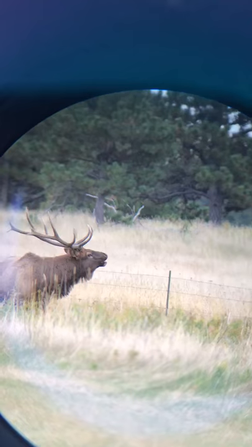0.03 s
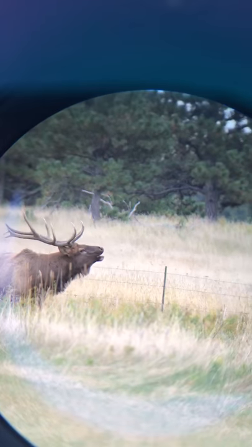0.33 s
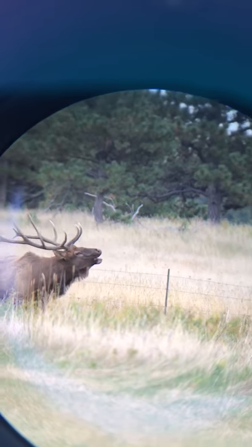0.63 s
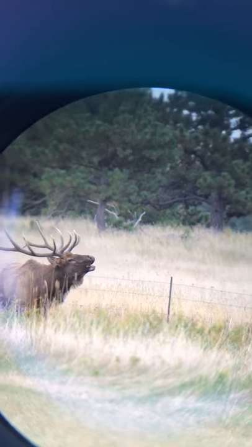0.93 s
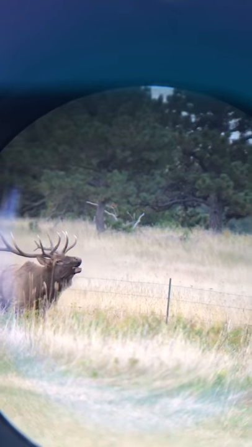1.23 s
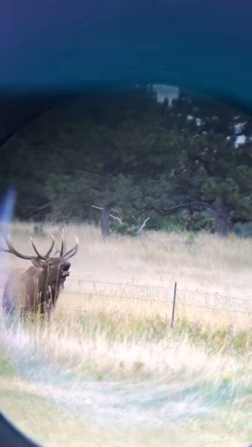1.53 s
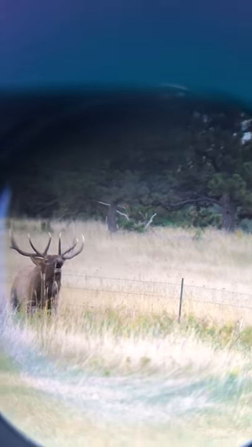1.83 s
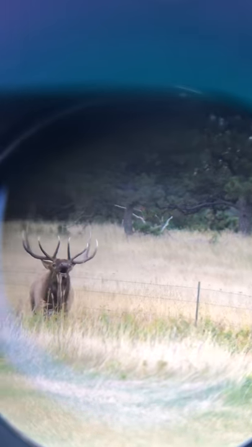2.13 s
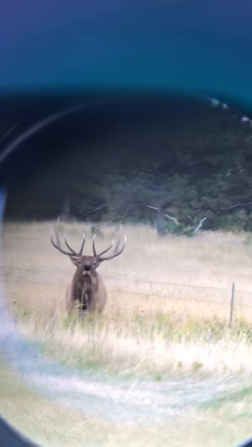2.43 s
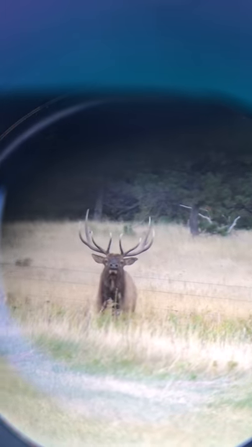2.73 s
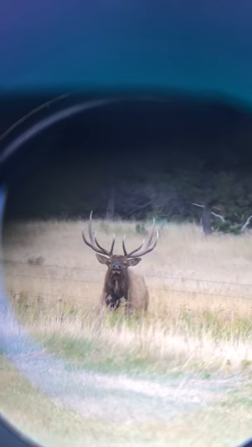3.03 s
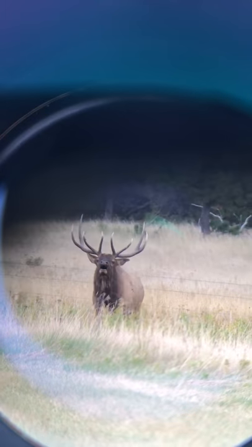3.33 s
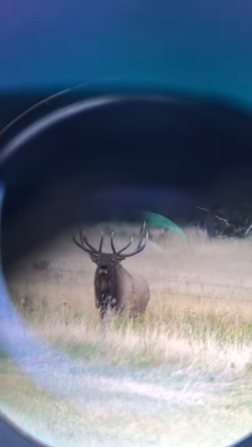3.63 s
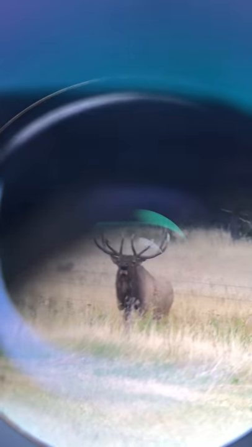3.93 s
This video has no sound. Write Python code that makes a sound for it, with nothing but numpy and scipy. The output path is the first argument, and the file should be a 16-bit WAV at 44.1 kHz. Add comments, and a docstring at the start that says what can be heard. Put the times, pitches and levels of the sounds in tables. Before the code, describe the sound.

A bull elk bugles across an open meadow, with wind rumbling on the microphone and a faint electrical sizzle and hiss throughout. At about 1 second its whistle climbs in steps, holding high from 1.5 to 2 seconds. It then slides down into a harsh, breathy roar with hoarse squeals, fading just after 3 seconds with a faint echo. At 3.8 seconds a second call sweeps upward.

```python
"""An open meadow, with wind buffeting the microphone and a thin electrical sizzle over the camera's hiss.
A second in, a bull elk bugles across the grass: his whistle climbs in steps and holds. Just after
two seconds it slides down into a harsh roar, fold pulses and breath ringing his throat, and the trees
answer faintly. Near four seconds a second call sweeps up."""
import sys
import numpy as np
from scipy import signal
from scipy.fft import rfft, irfft, next_fast_len
from scipy.io import wavfile
from scipy.ndimage import uniform_filter1d, map_coordinates

SR = 44100
rng = np.random.default_rng(int(sys.argv[2]) if len(sys.argv) > 2 else 0)


def transcribe(signal):
    """Save signal, clipped to [-1, 1], as a 16-bit WAV file at the path in sys.argv[1]."""
    frames = np.atleast_2d(signal).T
    limited = np.clip(frames, -1, 1)
    pcm = np.round(limited * 32767).astype(np.int16)
    wavfile.write(sys.argv[1], SR, pcm)


N = 176400


def amp(db):
    """Decibels to gain."""
    return 10 ** (np.asarray(db) / 20)


def unit(x):
    """Scale to rms 1."""
    return x / np.sqrt(np.mean(x ** 2) + 1e-20)


def clock():
    """Time of every sample in seconds."""
    return np.arange(N) / SR


def curves(rows):
    """One value per sample for each column after the time."""
    times, *columns = np.transpose(rows)
    return [np.interp(clock(), times, column) for column in columns]


def during(rows):
    """1 while a table lasts, with short fades outside it."""
    return np.clip(1 + np.minimum(clock() - rows[0][0], rows[-1][0] - clock()) / 0.026, 0, 1)


def wobble(rate):
    """A smooth random curve, rate knots a second."""
    return map_coordinates(rng.standard_normal(8192), [clock() * rate + 2], mode="wrap")


def rasp(rate):
    """A complex wobble that shakes a tone's level and phase."""
    return (wobble(rate) + 1j * wobble(rate)) / np.sqrt(2)


def filtered(x, response):
    """x through a gain given as a function of frequency."""
    size = next_fast_len(N + SR // 2)
    return irfft(rfft(x, size) * response(np.fft.rfftfreq(size, 1 / SR)), size)[:N]


def coloured(x, spectrum):
    """x through a (Hz, dB) spectrum, at rms 1."""
    freqs, db = np.transpose(spectrum)
    return unit(filtered(x, lambda hz: amp(np.interp(np.log(hz + 1), np.log(freqs), db))))


# The bull across the meadow: his long bugle, then the rising second call.
# Each row: time in seconds, pitch in Hz, level in dB, roughness from 0 to 1.
LONG_CALL = [(1.02, 1303, -91, .1), (1.06, 1376, -71.5, 0), (1.1, 1387, -66.5, 0), (1.14, 1454, -73, 0.23),
             (1.23, 1452, -70.5, 0.3), (1.29, 1443, -62, 0), (1.315, 1499, -71, 0.9),
             (1.345, 1600, -67.5, 0), (1.41, 1622, -57.5, 0), (1.465, 1632, -63.5, 0.07),
             (1.48, 1790, -69, 0.3), (1.505, 1852, -65, 0), (1.58, 1853, -56.5, .002),
             (1.67, 1863, -62, 0.04), (1.8, 1855, -56.5, .002), (1.87, 1854, -63.5, .002),
             (1.92, 1848, -69.5, 0.03), (1.965, 1844, -61, 0.04), (1.998, 1832, -58.5, 0),
             (2.015, 1756, -76, .6), (2.06, 1644, -53, 0.1), (2.09, 1530, -57, 0.3), (2.125, 1385, -47, 0),
             (2.16, 1357, -60, 0.08), (2.19, 1245, -93, .7), (2.25, 1110, -66, 1)]
RISING_CALL = [(3.78, 613.5, -81, 0.16), (3.802, 648, -65.5, 0.13), (3.812, 794, -74, 0.7),
               (3.82, 954, -58.5, 0.11), (3.832, 980, -66, 0.11), (3.839, 1378, -58.5, 0.6),
               (3.847, 1554, -57.5, 0.59), (3.855, 1700, -53.5, 0.11), (3.872, 1730, -61.5, 0.32),
               (3.885, 1863, -60.5, 0.06), (3.935, 1852, -55, .04), (4.0, 1823, -56, 0.078)]
# The octave above each call. Each row: time in seconds, level in dB.
LONG_OCTAVE = [(1.02, -115), (1.45, -105), (1.5, -87), (1.58, -74), (1.65, -66), (1.82, -61), (1.919, -59),
               (1.97, -64), (2.01, -62), (2.06, -71), (2.12, -69), (2.16, -64), (2.21, -64), (2.25, -74)]
RISING_OCTAVE = [(3.78, -86), (3.83, -75), (3.85, -87), (3.868, -80), (3.883, -59.5), (3.93, -55),
                 (3.965, -63.5), (4.0, -63)]


def whistle(call, octave, fold_cycles):
    """A wavering tone and two overtones; roughness smears them and adds the flutter of the folds."""
    hz, db, roughness = curves(call)
    octave_db, = curves(octave)
    third_db = octave_db - 31.5
    phase = 2 * np.pi * np.cumsum(hz * (1 + 0.0015 * wobble(60))) / SR
    flutter = 0.21 * np.cos(2 * np.pi * fold_cycles)
    out = np.zeros(N)
    for harmonic, level in enumerate([db, octave_db, third_db], 1):
        grain = np.sqrt(1 - roughness) + np.sqrt(roughness) * (rasp(265.2) + flutter)
        out += amp(level) * np.real(grain * np.exp(1j * harmonic * phase))
    return np.sqrt(2) * out * during(call)


# His breath as it reaches the microphone, faint under the whistle and loud in the roar.
# Each row: time in seconds, then the levels in dB of the low, middle and top resonances.
ROAR_LEVELS = [(1.0, -84, -98, -100), (1.2, -93, -85, -90), (1.32, -85, -84, -89), (1.48, -80, -76.5, -82),
               (1.6, -88, -82, -92), (1.8, -89, -89, -93), (1.97, -82, -88, -93), (2.02, -80.5, -64.5, -68),
               (2.12, -72, -62, -71), (2.2, -69.5, -65.5, -69.5), (2.279, -71, -65, -68.5),
               (2.39, -68.5, -65.5, -69), (2.501, -67.5, -63.5, -70), (2.65, -65.5, -62.5, -68.5),
               (2.74, -66.5, -62.5, -65), (2.83, -68.5, -62, -67), (2.9, -62.5, -65.5, -70.5),
               (2.97, -65.5, -62.5, -72.5), (3.045, -66.5, -72, -76.5), (3.1, -72, -84, -93),
               (3.4, -75, -94, -104), (3.6, -82.5, -100, -102), (3.72, -79, -101, -84),
               (3.8, -93, -75, -88), (3.83, -67, -68, -72.5), (3.9, -80, -63.5, -74),
               (4.0, -77, -70.5, -78)]
# Resonances of his throat and mouth. Each row: centre in Hz, width in Hz, relative level in dB.
LOW_MODES = [(560, 41, 1), (674, 82, 0.5), (964.5, 100, 6), (1072, 31, 6)]
MID_MODES = [(1410, 30, -2), (1470, 250, -9.5), (1626, 43, -3), (1970, 58, -3), (2091, 108, 2.5),
             (2320, 87, 0.5), (2564, 110, -5), (2790, 220, -9)]
TOP_MODES = [(3163, 70, -4), (3264, 82, 0), (3540, 180, -5), (3800, 130, -18.5), (3983, 170, -1.5),
             (4490, 290, -17.5), (5390, 440, -22.5)]


def roar(fold_cycles, chop_depth=0.23, pulse_gain=0.57):
    """Ragged fold pulses and the air they chop ring the throat."""
    closures = np.diff(np.floor(fold_cycles), prepend=0)
    pulses = unit(closures * amp(rng.standard_normal(N)))
    breath = unit(rng.standard_normal(N) * np.exp(chop_depth * np.cos(2 * np.pi * fold_cycles)))
    source = breath + pulse_gain * pulses
    bands = zip(curves(ROAR_LEVELS), [LOW_MODES, MID_MODES, TOP_MODES])
    return during(ROAR_LEVELS) * sum(amp(db) * throat(source, modes) for db, modes in bands)


def throat(source, modes, swell_db=1.5, swell_hz=12):
    """Steep-sided resonances, each swelling on its own; their sum is at rms 1."""
    out = np.zeros(N)
    for hz, width, db in modes:
        band = filtered(source, lambda f: np.abs(f * width / (hz * hz - f * f + 1j * f * width)) ** 2)
        out += band * amp(db + swell_db * wobble(swell_hz))
    return unit(out)


def vocal_folds(growl_hz=118.15, jitter=0.064):
    """Running cycle count of the unsteady folds under the whistle and the roar."""
    return np.cumsum(growl_hz * (1 + jitter * wobble(70))) / SR


# Hoarse squeals where his voice breaks or turns harsh. Each row: middle in seconds,
# length in seconds, pitch in Hz, glide in Hz per second, level in dB.
VOICE_BREAKS = [(1.329, 0.074, 1404, -800, -69), (1.315, 0.058, 1875, 900, -80),
                (2.021, 0.066, 2410, -5000, -69), (2.077, 0.041, 2076, -3000, -60),
                (2.12, 0.094, 3340, 0, -65), (2.288, .04, 2070, 0, -67), (2.385, .07, 974, -300, -62.5),
                (2.66, 0.087, 2690, 1200, -64.5), (2.8, 0.63, 3190, -600, -70), (2.833, 0.27, 1082, 8, -69),
                (2.947, .06, 1670, 0, -65.5), (3.011, 0.067, 1399, 0, -64), (2.125, 0.057, 650, 0, -69),
                (3.828, .04, 2930, 9000, -68.5), (3.958, 0.26, 2350, 904, -66), (3.982, .05, 2930, 0, -68)]


def squeals():
    """The voice breaks into short gliding tones, each swelling and dying under a rasp."""
    out = np.zeros(N)
    grain = 1 + rasp(125.8)
    for middle, length, hz, glide, db in VOICE_BREAKS:
        span = np.abs(clock() - middle) < length / 2
        t = clock()[span] - middle
        tone = np.exp(2j * np.pi * (hz + glide * t / 2) * t)
        out[span] += amp(db) * np.cos(np.pi * t / length) * np.real(grain[span] * tone)
    return out


# Tone of the echo from the meadow's edge. Each row: frequency in Hz, relative level in dB.
ECHO_SPECTRUM = [(300, -3.5), (1400, 3.5), (2000, -12.5), (4000, -9)]


def tree_echo(elk, level_db=-20.5, t60_s=0.86, delay_s=0.052):
    """The edge of the wood throws the call back, faint and dull."""
    t = clock()
    decay = amp(-60 * t / t60_s) * (t > delay_s)
    tail = coloured(rng.standard_normal(N), ECHO_SPECTRUM) * decay
    return amp(level_db) * signal.fftconvolve(elk, tail / np.linalg.norm(tail))[:N]


# Gusts right on the microphone. Each row: time in seconds, level in dB.
GUSTS = [(0.06, -53.5), (0.2, -38.5), (0.29, -51), (0.32, -39.5), (0.48, -60), (0.52, -45), (0.6, -87),
         (0.64, -42.5), (0.68, -57), (0.74, -36.5), (0.87, -64.5), (0.99, -36.5), (1.01, -53),
         (1.16, -48.5), (1.19, -58.5), (1.34, -49.5), (1.53, -69), (1.57, -59.5), (1.86, -78), (1.9, -59),
         (2.17, -55), (2.23, -45), (2.26, -52), (2.33, -44.5), (2.45, -55.5), (2.69, -39), (2.77, -34.5),
         (2.79, -53.5), (2.91, -40), (2.93, -51), (2.98, -38), (3.01, -46.5), (3.06, -37.5), (3.08, -48.5),
         (3.23, -50), (3.27, -45.5), (3.33, -60), (3.38, -49), (3.63, -51.5), (3.65, -72), (3.7, -49),
         (3.76, -72), (3.81, -50), (3.88, -78.5), (3.94, -40), (4.0, -54.5)]
# Sharp buffets among them. Each row: middle in seconds, level in dB, half length in seconds.
BUFFET_HITS = [(0.066, -43, 0.0044), (0.094, -44, .006), (.116, -42.5, 0.0061), (0.188, -29, 0.0069),
               (0.215, -37.5, 0.012), (.742, -51, 0.0081), (0.968, -55.5, 0.008), (2.24, -49, 0.012),
               (2.343, -39, 0.015), (2.577, -41, .025), (2.653, -35.5, 0.012), (2.7, -37, 0.011),
               (2.771, -56, 0.01), (2.883, -49.5, 0.022), (2.977, -40.5, 0.008), (3.055, -47, 0.0048),
               (3.268, -39.5, 0.0078), (3.39, -47, .01), (3.496, -49.5, 0.021)]
# Tone of the gusts and of the buffets. Each row: frequency in Hz, relative level in dB.
GUST_SPECTRUM = [(15, -43.5), (25, -22.5), (40, -3.5), (58, 2.5), (80, 3.5), (120, -12), (170, -15.5),
                 (300, -40), (500, -74), (1000, -100)]
BUFFET_SPECTRUM = [(30, -11), (70, -6.5), (125, 2), (175, -5), (215, -12.5), (260, -12), (340, -20),
                   (450, -33.5), (600, -48), (900, -77), (2000, -100)]


def wind():
    """Air tumbling over the microphone makes a gusty rumble with short, brighter buffets."""
    gust_db, = curves(GUSTS)
    rumble = amp(gust_db) * eddies(GUST_SPECTRUM, even_s=0.086)
    buffets = sum(amp(db) * np.exp(-0.5 * ((clock() - middle) / half_length) ** 2)
                  for middle, db, half_length in BUFFET_HITS)
    return rumble + buffets * eddies(BUFFET_SPECTRUM, even_s=0.02)


def eddies(spectrum, even_s):
    """Low turbulence whose strength is even over spans longer than even_s."""
    noise = coloured(rng.standard_normal(N), spectrum)
    power = uniform_filter1d(np.abs(signal.hilbert(noise)) ** 2 / 2, int(even_s * SR))
    return noise / np.sqrt(np.abs(power) + 0.036)


# Electrical sizzle in the camera. Each row: time in seconds, share of clock beats that fire.
SIZZLE_ACTIVITY = [(.06, 0.76), (.49, 0.69), (.51, .01), (.548, 0.0046), (.56, 0.33), (.585, 0.37),
                   (.595, .01), (.638, .01), (.66, 0.28), (.7, .7), (1.86, .62), (1.9, .04), (1.93, 0.52),
                   (1.97, 0.29), (1.99, 0.026), (2.03, 0.22), (2.1, .62), (3.59, 0.56), (3.65, 0.055),
                   (3.7, 0.3), (3.78, .6), (4, 0.67)]
# Tone of its ticks, tone of the smooth hiss that comes with them, and the lines of its whine.
# Each row: frequency in Hz, relative level in dB.
TICK_SPECTRUM = [(500, -50), (2000, -26.5), (3000, -20), (3500, -25.5), (4500, -27), (5000, -28),
                 (6600, -35.5), (7400, -24), (8100, -32), (9000, -22), (9800, -21.5), (10500, -29.5),
                 (11700, -20.5), (12600, -10.5), (13050, -20.5), (13600, -11), (14000, -1), (14450, -11),
                 (14850, -9), (15700, -23.5)]
SMOOTH_SPECTRUM = [(300, 3.5), (1500, 0), (2600, 1), (4600, 6), (5000, -16), (5600, 2.5), (6600, -11),
                   (7400, -9), (8100, -4), (9500, -16.5), (10600, -23), (15700, -2)]
WHINE_LINES = [(3000, -17), (4000, -20), (9000, -20), (10000, -23), (11000, -28), (12000, -21),
               (14500, -20), (15000, -15)]


def sizzle(level_db=-65.5, beat_hz=1000, scatter_s=0.00017, half_tick_s=0.00025, spread_db=3):
    """Tiny electrical bursts fire on random beats of a steady clock; hiss and whine grow with them."""
    t = clock()
    activity, = curves(SIZZLE_ACTIVITY)
    beat = (t * beat_hz).astype(int)
    shift, size = rng.standard_normal((2, beat[-1] + 1))[:, beat]
    fires = rng.random(beat[-1] + 1)[beat] < activity
    from_tick = t - (beat + 0.5) / beat_hz - scatter_s * shift
    bursts = fires * amp(spread_db * size) * np.exp(-0.5 * (from_tick / half_tick_s) ** 2)
    ticks = coloured(bursts * np.sign(rng.standard_normal(N)), TICK_SPECTRUM)
    whine = sum(amp(db) * np.sqrt(2) * np.sin(2 * np.pi * hz * t) * (1 + 0.082 * wobble(40))
                for hz, db in WHINE_LINES)
    smooth = amp(-15.5) * coloured(rng.standard_normal(N), SMOOTH_SPECTRUM)
    load = activity / activity.mean()
    return amp(level_db) * (ticks + np.sqrt(load) * smooth + load * whine)


# The camera's noise floor, behind everything. Each row: frequency in Hz, relative level in dB.
HISS_SPECTRUM = [(100, 19.5), (400, 9), (700, 5.5), (1300, 0.5), (2000, -2), (4000, -4.5), (5500, -6),
                 (10500, -8.5), (12600, 4.5), (14400, -6.5), (15700, -9.5)]


def camera_hiss(level_db=-70):
    """The camera's own steady noise, strongest in the bass, with a peak in the high treble."""
    return amp(level_db) * coloured(rng.standard_normal(N), HISS_SPECTRUM)


def scene():
    """One microphone in the meadow: elk and trees far off, wind and camera noise up close."""
    fold_cycles = vocal_folds()
    bugle = whistle(LONG_CALL, LONG_OCTAVE, fold_cycles)
    second_call = whistle(RISING_CALL, RISING_OCTAVE, fold_cycles)
    elk = bugle + second_call + roar(fold_cycles) + squeals()
    hiss = camera_hiss()
    return (elk + tree_echo(elk) + wind() + sizzle() + hiss)[None]


def record(dry):
    """The sound opens with a stutter; the camera sheds the deepest rumble and the highest treble."""
    start_s, cut_s, resume_s, fade_s = 0.06, 0.0723, 0.082, 0.00099
    low_cut_hz, top_hz = 27.8, 15800
    t = clock()
    outside_gap = np.maximum(cut_s - t, t - resume_s)
    stutter = np.clip(np.minimum(t - start_s, outside_gap) / fade_s, 0, 1)
    trimmed = filtered(dry[0], lambda hz: 1 / np.sqrt(1 + (low_cut_hz / (hz + 1)) ** 6))
    return filtered(trimmed * stutter, lambda hz: hz < top_hz)[None]


dry = scene()
out = record(dry)
transcribe(out)
```